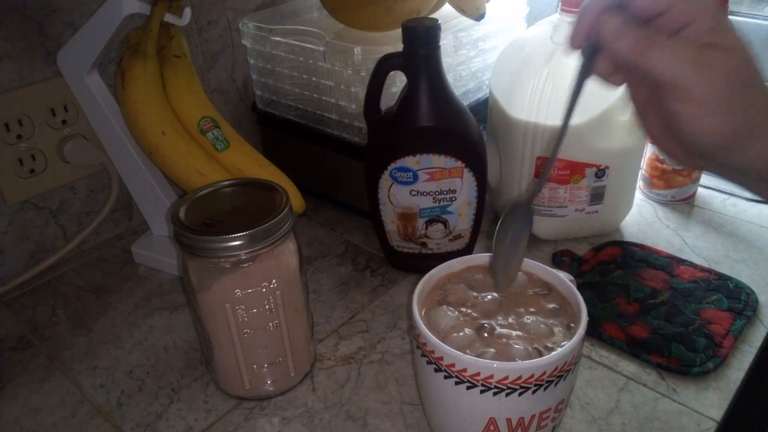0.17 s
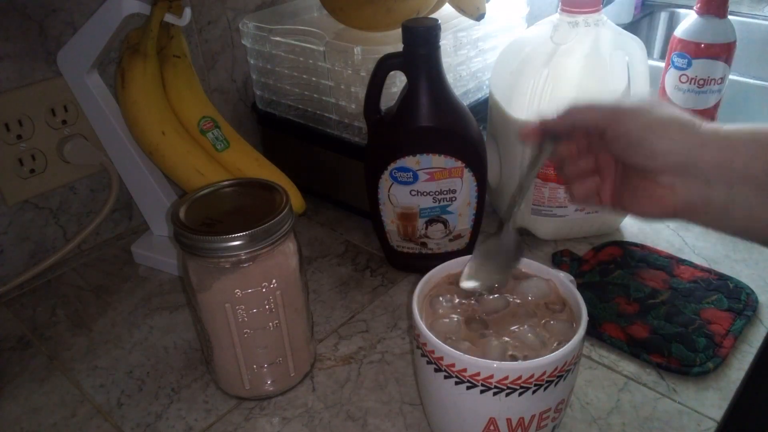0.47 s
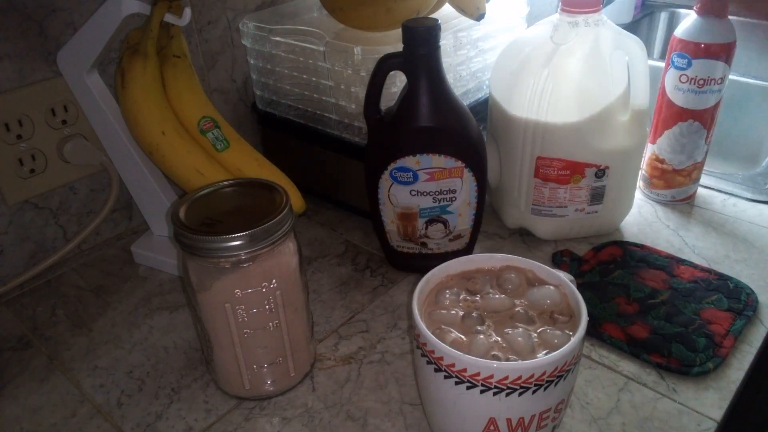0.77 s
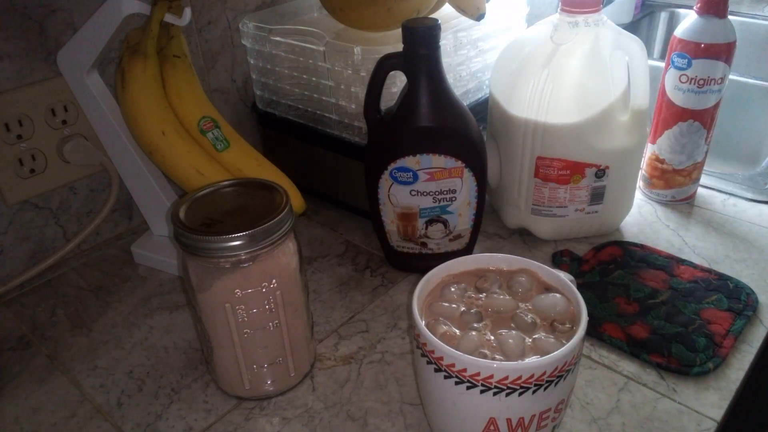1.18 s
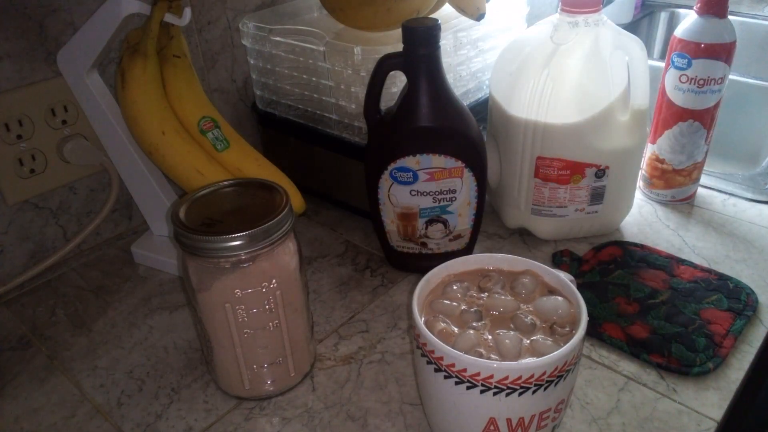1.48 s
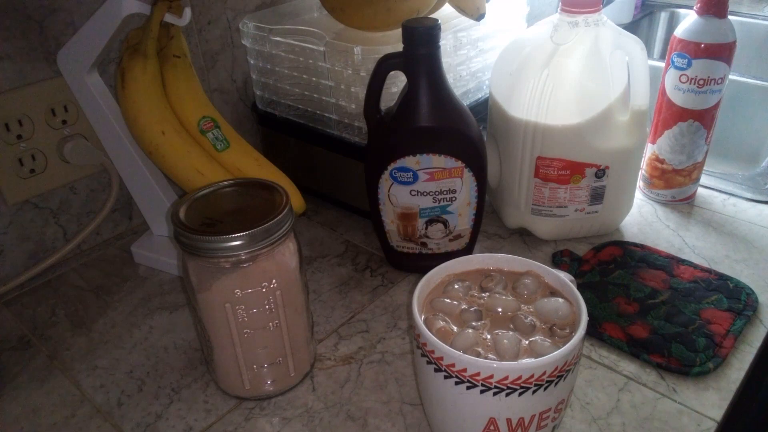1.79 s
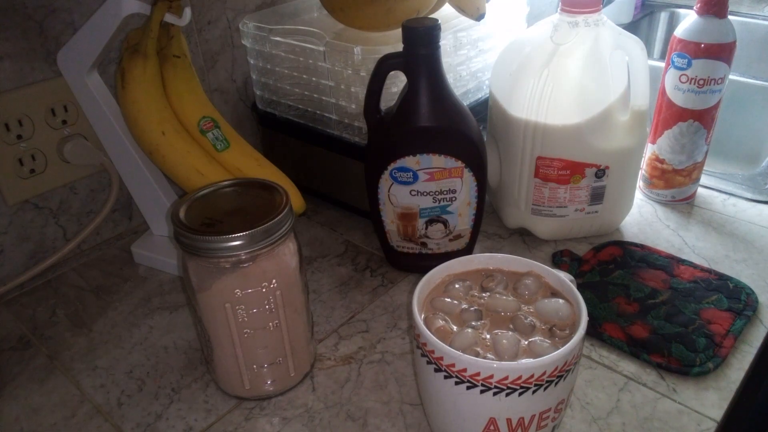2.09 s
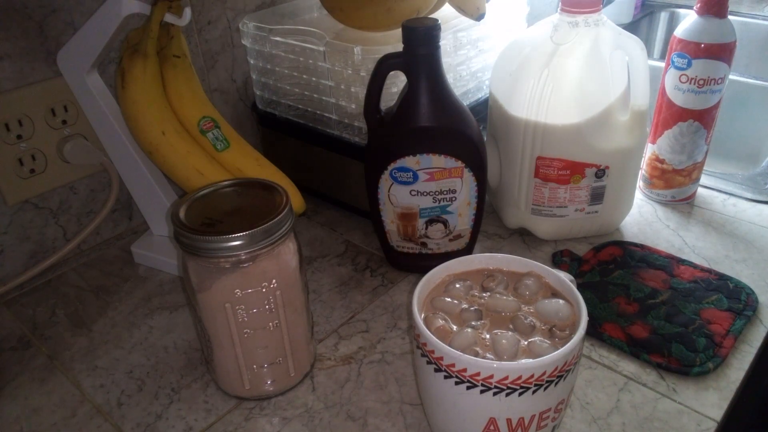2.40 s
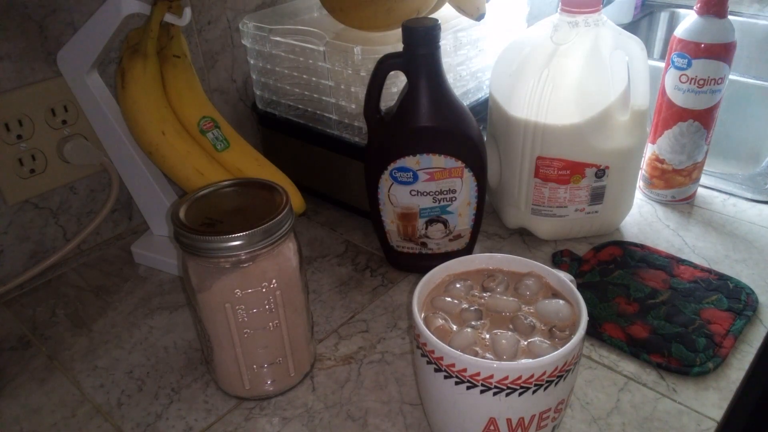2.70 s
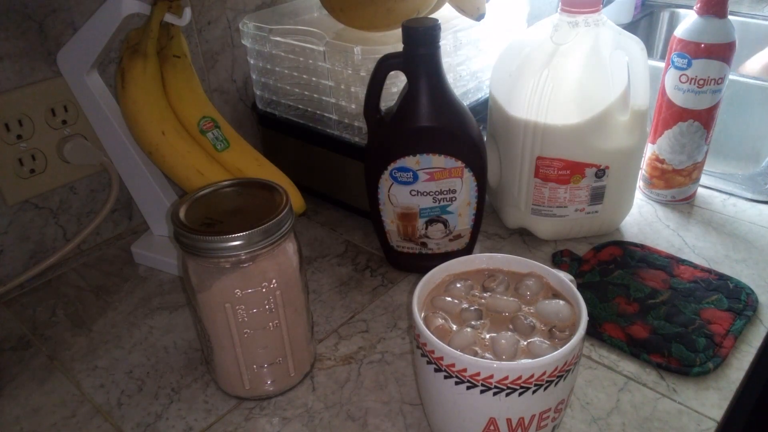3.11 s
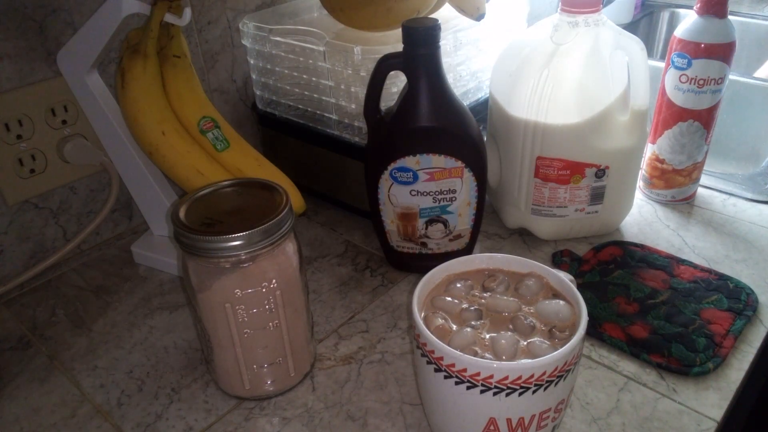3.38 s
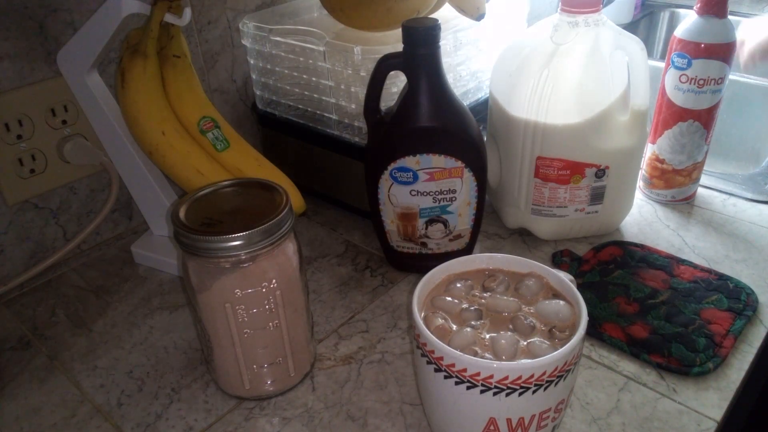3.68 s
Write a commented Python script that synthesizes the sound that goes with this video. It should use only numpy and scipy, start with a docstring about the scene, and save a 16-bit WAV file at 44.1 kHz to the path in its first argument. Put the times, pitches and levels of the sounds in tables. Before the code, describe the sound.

A spoon briefly stirs ice in a mug, then lands rattling in a metal sink.

```python
"""A steel spoon clinks through an iced drink in a last stir, knocks the mug and is lifted out; the ice
settles. Light ticks and soft shuffles follow over a refrigerator's hum. Then metal, probably the spoon,
strikes a steel sink, bounces and rattles to rest. Impacts excite damped modes and bursts of noise,
friction makes swelling noise, and a small kitchen, heard from close by, adds a short reverberation."""
import sys
import numpy as np
from scipy import signal
from scipy.fft import rfft, irfft
from scipy.io import wavfile
from scipy.ndimage import uniform_filter1d

SR = 44100
rng = np.random.default_rng(int(sys.argv[2]) if len(sys.argv) > 2 else 0)


def wrap_up_sound(samples):
    """Save the sound to the file named by the first command line argument, as 16-bit audio."""
    columns = np.atleast_2d(samples).T
    # keep every value between -1 and 1, then stretch to whole-number steps
    tamed = np.clip(columns, -1, 1)
    steps = np.round(tamed * 32767).astype(np.int16)
    wavfile.write(sys.argv[1], SR, steps)


N = 169785
T = np.arange(N) / SR
EVENT_T = T[:int(.7 * SR)]  # time within one event [s]

# spoon against mug and ice (time [s], crack [dB], mug ring [dB], spoon ring [dB])
SPOON_KNOCKS = [(0.0, -35, -54, -58), (0.0642, -47, -19, -36), (0.0987, -24, -35, -35.5),
                (0.143, -35, -49, -64), (0.1818, -37.5, -42.5, -53), (0.191, -35.5, -66, -56)]
# modes of the filled mug and the hand-held spoon (frequency [Hz], level [dB], T60 [s])
MUG_MODES = [(1180, -18.5, 0.02), (1650, -22.5, 0.034), (2126, -9.5, 0.059), (2253, 0, 0.02),
             (2940, -1.5, 0.023), (4730, -27.5, 0.019), (7000, -14.5, 0.028), (8400, -26, 0.044),
             (11500, -21, 0.039), (15400, -4.5, .015)]
SPOON_MODES = [(2650, 2, 0.077), (5520, -3, 0.092), (10130, -11, 0.094), (15040, -5, 0.087)]
# envelope of the stirring (time [s], level [dB])
STIR_ENVELOPE = [(0, -40), (.05, -54), (.08, -41), (.115, -37.5), (.16, -48.5), (.22, -48.5), (.28, -63),
                 (.38, -72.5), (.46, -73)]
# the knocked mug thumps on the counter (time [s], level [dB])
MUG_THUMPS = [(.068, -35.5), (.095, -43)]
# spectra of a crack, the churning ice and a thump (frequency [Hz], level [dB])
CRACK_SPECTRUM = [(25, -47), (150, -13), (700, -10), (1500, -5.5), (3000, 8.5), (6500, -2), (8600, -27),
                  (12000, -12), (14000, -20), (15500, -15)]
CHURN_SPECTRUM = [(25, -51), (90, -12), (130, 14), (420, 2), (800, -1.5), (2000, 8), (3200, 4),
                  (6500, -7.5), (8500, -31.5), (15000, -40)]
THUMP_SPECTRUM = [(25, -44), (60, -24), (125, 1.5), (250, -4), (400, -7.5), (700, -9.5), (1200, -6.5),
                  (3000, -28)]
# cubes touching and drops falling (time [s], level [dB], pitch [Hz])
ICE_CLICKS = [(0.0195, -36, 2850), (0.0596, -30, 2830), (.081, -34, 5900), (.1445, -34.5, 1720),
              (0.1832, -28, 2940), (.2084, -40, 2000), (.235, -41, 3000), (0.3325, -54.5, 1320),
              (0.367, -46.5, 3000), (.385, -47, 2440), (0.4275, -55, 2500), (0.4826, -41.5, 4200),
              (.495, -47.5, 2870), (1.7885, -56, 2440)]
# modes of a cube (frequency [multiple of its pitch], level [dB])
CUBE_MODES = [(.94, -14), (1, 3), (1.09, -4), (1.22, -15)]

# blows on the sink (time [s], clash [dB], sheet wash [dB], basin ring [dB], boom [dB], cutlery [dB])
SINK_BLOWS = [(3.1815, -21, -30, -36.5, -50, -46.5), (3.207, -38, -39, -49.5, -33, -68),
              (3.4712, -20, -40, -37.5, -51, -47), (3.511, -20, -43, -52, -63, -27),
              (3.551, -18, -32, -31.5, -41, -51), (3.664, -46, -41.5, -57, -33, -61)]
# starting levels of the rattle (clash [dB], sheet wash [dB], basin ring [dB], boom [dB], cutlery [dB])
RATTLE_LEVELS = (-22, -35.5, -39, -36.5, -66)
# modes of the basin, its low boom and the free cutlery (frequency [Hz], level [dB], T60 [s])
BASIN_MODES = [(484.9, -10, .7), (588.3, -1, .42), (640, -10, .2), (706, -5, .35), (742, -8, .3),
               (795, -11, .3), (854.6, -6, .45), (1040, -13, .3), (1351, -16, .4), (1839, -14, .45),
               (1862, -14, .45)]
BOOM_MODES = [(112, -16, .2), (155, -10, .25), (189.3, 0, .42), (270.7, -5, .3), (369.4, -9, .3)]
CUTLERY_MODES = [(4650, -15, .45), (5275, -16, .35), (7134, -13, .35), (10736, 0, .17), (10809, -5, .17),
                 (11219, -11, .2), (15008, -4, .22), (15323, -6, .22)]
# spectra of the clash and the steel sheet's dense modes (frequency [Hz], level [dB])
CLASH_SPECTRUM = [(200, -34), (600, 4.5), (1300, -10), (1900, 0.5), (2700, -1.5), (6400, 1.5), (8200, -6.5),
                  (12000, -3.5), (13800, 0), (15200, 7.5)]
SHEET_SPECTRUM = [(80, -16), (170, 11), (400, 5), (650, 11), (1300, 3.5), (1900, 6.5), (2700, -1),
                  (6400, 0.5), (8200, -5), (12000, -1.5), (13800, -3), (15200, -17.5)]
# decay of the sheet (frequency [Hz], T60 [s])
SHEET_DECAY = [(200, 0.41), (2000, 0.36), (6500, 0.45), (9000, 0.25), (15000, 0.15)]
# envelope of metal sliding between blows (time [s], level [dB])
SLIDE_ENVELOPE = [(3.2, -62), (3.29, -59), (3.335, -46.5), (3.39, -56), (3.435, -53.5), (3.47, -57.5)]
# resonances of the slide (centre [Hz], width [Hz], level [dB])
SLIDE_BANDS = [(450, 100, 7), (1850, 220, 1), (2660, 220, -12.5), (3190, 160, -11), (4380, 320, -2),
               (5360, 140, -11), (6540, 260, -2), (7480, 200, -8.5), (4000, 7800, -4.5), (12500, 2430, -4),
               (15100, 900, -5)]

# ticks (time [s], level [dB], centre [Hz], half-width [octaves], sizzle [dB], reverberation [dB])
LIGHT_TICKS = [(0.8414, -45.5, 10900, 0.23, -40, -16), (0.848, -46.5, 5900, 0.54, -33, -11),
               (0.8902, -39, 5650, 0.18, -54, -1.5), (.893, -53.5, 2680, 0.23, -66, 9),
               (1.2441, -42.5, 6200, 0.11, -69, -10.5), (1.2461, -48, 3600, 0.17, -65, -7.5),
               (1.281, -47, 9340, 0.19, -62, -3.5), (1.4729, -46, 4550, .25, -23, -1),
               (1.4788, -52.5, 3760, 0.12, -36, -4), (1.6548, -43.5, 5330, 0.69, -65, -5),
               (2.138, -50.5, 9680, 0.031, -49, 4)]
# shuffles (peak time [s], 20 dB rise [s], 20 dB fall [s], swish [dB], rub [dB])
SOFT_SHUFFLES = [(.9, 0.078, 0.063, -49.5, -68), (1.571, 0.033, 0.078, -40.5, -47),
                 (1.673, 0.041, 0.078, -43, -53.5), (2.059, 0.051, 0.27, -61.5, -71.5),
                 (2.262, 0.059, 0.16, -51, -54), (2.305, 0.081, 0.097, -49, -55.5),
                 (2.431, 0.28, 0.067, -56, -68), (2.634, 0.054, 0.12, -60, -65.5),
                 (2.72, 0.075, 0.096, -53, -61.5), (2.884, 0.04, 0.09, -47.5, -99),
                 (2.925, 0.062, 0.049, -49, -80)]
# spectra of the bright swish and the lower rub (frequency [Hz], level [dB])
SWISH_SPECTRUM = [(800, -48), (2500, -13), (4000, -7.5), (5900, 1.5), (6800, -3.5), (8000, -14.5),
                  (9700, -8.5), (13500, -11), (15200, -1)]
RUB_SPECTRUM = [(300, -6), (800, -5), (1500, -1.5), (2500, -0.5), (4000, -1.5), (12000, -25)]

# steady tones of the refrigerator's motor (frequency [Hz], level [dB])
MOTOR_TONES = [(360.5, -72), (425.5, -69)]
# narrow noise bands of the refrigerator's hum (centre [Hz], half-width [Hz], level [dB], fall [dB/s])
HUM_BANDS = [(128.5, 9.3, -57, 1), (180.2, 19, -58.5, 2.3), (241.9, 12.8, -59, 1.5), (281.3, 25, -65, 1),
             (357, 21, -62, 4.5)]
# envelope of the hum (time [s], gain [dB])
HUM_ENVELOPE = [(0, -16), (.25, 4.5), (.34, -10), (.41, 1.5), (.56, 2), (.69, 3), (.73, -10), (.88, 10),
                (1.1, -4), (1.32, 9), (1.46, -5), (1.62, -2), (1.89, 1.5), (2.0, -6.5), (2.38, -4),
                (2.8, -1.5), (3.1, 2.5), (3.85, -1.5)]
# spectrum of the ambient noise (frequency [Hz], level [dB])
AIR_SPECTRUM = [(20, -26), (50, -11.5), (85, -13), (130, 0.5), (300, -6.5), (500, -13.5), (1000, -21.5),
                (2000, -29), (6000, -33), (8500, -42.5), (15000, -39.5)]
# reverberation time of the kitchen (frequency [Hz], T60 [s])
ROOM_DECAY = [(150, 0.33), (1000, 0.16), (6000, 0.23), (10000, 0.093), (15000, 0.16)]


def stirred_drink(room_db=-12.5):
    """Impact excitation: each contact gives a burst of noise; mug, spoon and cubes ring in their modes."""
    out = churning_ice()
    for start, crack_db, mug_db, spoon_db in SPOON_KNOCKS:
        crack = amp(crack_db) * burst(noise(CRACK_SPECTRUM), t60=0.023)
        add(out, start, crack + amp(mug_db) * ring(MUG_MODES) + amp(spoon_db) * ring(SPOON_MODES))
    for start, db in MUG_THUMPS:
        add(out, start, amp(db) * burst(noise(THUMP_SPECTRUM), t60=0.3))
    for start, db, hz in ICE_CLICKS:
        cube = ring([(hz * ratio, mode_db, 0.018) for ratio, mode_db in CUBE_MODES])
        chip = amp(-9.5) * burst(band(hz, octaves=0.45), t60=0.011)
        add(out, start, amp(db) * (cube + chip) * rise(seconds=0.00025))
    return out + amp(room_db) * reverberation(out)


def churning_ice(contacts_per_s=700, spread_db=2.5):
    """Shot noise: many small collisions at random times merge into a grainy churn."""
    impulses = (rng.random(N) < contacts_per_s / SR) * rng.choice([-1, 1], N)
    strengths = amp(spread_db * np.minimum(rng.exponential(size=N), 3))
    grain = rng.standard_normal(len(EVENT_T)) * fade(t60=.02)
    churn = signal.fftconvolve(impulses * strengths, grain)[:N]
    return colour(churn, CHURN_SPECTRUM) * envelope(STIR_ENVELOPE, right=-120)


def steel_sink(shimmer_depth=0.5, room_db=-7):
    """Plate vibration: each blow excites the basin's sparse and dense modes, and the cutlery rings."""
    out, ringing = np.zeros(N), np.zeros(N)
    blows = SINK_BLOWS + rattle()
    sheet = wash(ripple(noise(SHEET_SPECTRUM), db=1.5, spacing_hz=128.6), SHEET_DECAY)
    for start, clash_db, sheet_db, basin_db, boom_db, cutlery_db in blows:
        clash = amp(clash_db) * burst(noise(CLASH_SPECTRUM), t60=0.13)
        boom = amp(boom_db) * ring(BOOM_MODES, scatter_db=2.5) * rise(seconds=0.0036)
        add(out, start, (clash + amp(sheet_db) * sheet + boom) * rise(seconds=0.002))
        basin = amp(basin_db) * ring(BASIN_MODES, scatter_db=1.5)
        cutlery = amp(cutlery_db) * ring(CUTLERY_MODES, scatter_db=2)
        add(ringing, start, basin + cutlery)
    shimmer = 1 + shimmer_depth * flicker(seconds=0.011)  # the ring wavers as the metal shifts
    out += ringing * shimmer + sliding_metal()
    return out + amp(room_db) * reverberation(out)


def rattle(start_s=3.56, end_s=3.6887, bounces_per_s=110, fade_db=10, scatter_db=3):
    """Inelastic rebounds: quick, uneven blows lose energy. Returns rows like those of SINK_BLOWS."""
    blows = []
    for k, (jitter, strength) in enumerate(rng.uniform(-1, 1, (32, 2))):
        time = start_s + (k + jitter / 2) / bounces_per_s
        progress = (time - start_s) / (end_s - start_s)
        if progress < 1:
            levels = np.array(RATTLE_LEVELS) - fade_db * progress ** 2 + scatter_db * strength
            blows.append((time, *levels))
    return blows


def sliding_metal():
    """Sliding friction drives the resonances of metal on the basin with noise."""
    scrape = sum(amp(db) * band(hz, np.log2(1 + width / hz / 2), N) for hz, width, db in SLIDE_BANDS)
    return unit(scrape) * envelope(SLIDE_ENVELOPE, left=-120, right=-120)


def ticks():
    """Brief, hard contacts excite high frequencies: a damped resonance and a very high sizzle."""
    out, to_room = np.zeros(N), np.zeros(N)
    for start, db, hz, octaves, sizzle_db, room_db in LIGHT_TICKS:
        sizzle = band(15150, octaves=.045) + amp(-14.5) * band(14500, octaves=0.38)
        tick = amp(db) * burst(band(hz, octaves), t60=0.029) + amp(sizzle_db) * burst(sizzle, t60=.012)
        add(out, start, tick)
        add(to_room, start, amp(room_db) * tick)
    return out + reverberation(to_room)


def shuffles(grain_db=1.0, surge_db=1.5, room_db=-11):
    """Friction noise: cloth or soles brush in grainy strokes that swell and die away."""
    out = np.zeros(N)
    middle_s = EVENT_T.mean()
    from_peak = EVENT_T - middle_s
    for peak_s, rise_s, fall_s, swish_db, rub_db in SOFT_SHUFFLES:
        swell = amp(-20 * np.maximum(-from_peak / rise_s, from_peak / fall_s))
        swish = amp(swish_db) * ripple(noise(SWISH_SPECTRUM), db=3.5, spacing_hz=260)
        rub = amp(rub_db) * ripple(noise(RUB_SPECTRUM), db=4, spacing_hz=170)
        add(out, peak_s - middle_s, swell * (swish + rub))
    out *= unit(amp(grain_db * flicker(seconds=0.0015) + surge_db * flicker(seconds=0.02)))
    return out + amp(room_db) * reverberation(out)


def background(air_db=-59.5):
    """Narrow-band noise: the refrigerator's low, wavering hum, with its steady motor tones and dull air."""
    hum = sum(amp(db - fall * T) * band(hz, np.log2(1 + half_width / hz), N)
              for hz, half_width, db, fall in HUM_BANDS)
    motor = sum(amp(db) * unit(np.sin(2 * np.pi * hz * T)) for hz, db in MOTOR_TONES)
    return hum * envelope(HUM_ENVELOPE) + motor + amp(air_db) * noise(AIR_SPECTRUM, N)


def reverberation(x, build_s=0.002):
    """Diffuse reflections: convolution with the kitchen's decaying response of unit energy."""
    build_up = 1 - np.exp(-(EVENT_T / build_s) ** 2)
    response = wash(rng.standard_normal(len(EVENT_T)), ROOM_DECAY) * build_up
    return signal.fftconvolve(x, response / np.sqrt(np.sum(response ** 2)))[:N]


def ring(modes, scatter_db=0):
    """Free vibration as a sum of damped sines; scatter varies level and sign, as the struck spot does."""
    out = np.zeros(len(EVENT_T))
    for hz, db, t60 in modes:
        strength, side = rng.standard_normal(2)
        gain = amp(db + scatter_db * strength) * (np.sign(side) if scatter_db else 1)
        out += gain * np.sin(2 * np.pi * hz * EVENT_T) * fade(t60)
    return out


def wash(x, decays):
    """Modal overlap: countless modes act as noise, each octave fading at its own rate."""
    hz, t60 = np.array(decays, float).T
    log_centres = np.log(np.geomspace(125, 16000, 8))
    log_f, spectrum = np.log(frequencies(len(x))), rfft(x)
    out = np.zeros(len(x))
    for centre, weights in zip(log_centres, np.eye(len(log_centres))):
        octave = irfft(spectrum * np.interp(log_f, log_centres, weights), len(x))
        out += octave * fade(np.interp(centre, np.log(hz), t60))
    return out


def ripple(x, db, spacing_hz):
    """Interference: reflections from nearby surfaces cut random peaks and dips into a spectrum."""
    f = np.fft.rfftfreq(len(x), 1 / SR)
    heights = rng.standard_normal(512)
    gain = amp(db * np.interp(f / spacing_hz, np.arange(len(heights)), heights))
    return unit(irfft(rfft(x) * gain, len(x)))


def colour(x, points):
    """Filter by (frequency [Hz], level [dB]) points; rms 1."""
    hz, db = np.array(points, float).T
    gain = amp(np.interp(np.log(frequencies(len(x))), np.log(hz), db))
    return unit(irfft(rfft(x) * gain, len(x)))


def noise(points, size=len(EVENT_T)):
    """Coloured noise, rms 1."""
    return colour(rng.standard_normal(size), points)


def band(hz, octaves, size=len(EVENT_T)):
    """Noise in one steep-sided band, rms 1."""
    detuning = np.log2(frequencies(size) / hz) / octaves
    return unit(irfft(rfft(rng.standard_normal(size)) / (1 + detuning ** 2 / 2) ** 2, size))


def burst(x, t60):
    """Noise decaying exponentially from level 1."""
    decay = fade(t60)
    return unit(x * decay) * np.sqrt(np.mean(decay ** 2))


def fade(t60):
    """Exponential damping: 60 dB in t60 seconds."""
    return np.exp(-np.log(1000) * EVENT_T / t60)


def rise(seconds):
    """Soft onset of a contact."""
    return 1 - np.exp(-EVENT_T / seconds)


def flicker(seconds):
    """Random wavering on a given time scale, rms 1."""
    size = int(seconds * SR)
    return unit(uniform_filter1d(uniform_filter1d(rng.standard_normal(N), size), size))


def envelope(points, left=None, right=None):
    """Gain along (time [s], level [dB]) points; left and right are the levels outside them."""
    return amp(np.interp(T, *np.array(points).T, left=left, right=right))


def frequencies(size):
    """Frequency axis of a spectrum, at least 1 Hz."""
    return np.maximum(np.fft.rfftfreq(size, 1 / SR), 1)


def amp(db):
    """Decibels to gain."""
    return 10 ** (np.asarray(db) / 20)


def unit(x):
    """Scale to rms 1."""
    return x / np.sqrt(np.mean(x ** 2) + 1e-30)


def add(out, start_s, x):
    """Mix x into out from start_s."""
    i = min(max(int(start_s * SR), 0), N)
    out[i:i + len(x)] += x[:N - i]


def scene():
    """Superposition: the pressures of all sources add at one point."""
    return (background() + stirred_drink() + ticks() + shuffles() + steel_sink())[None]


def record(dry, low_cut_hz=50, top_hz=15800):
    """Band limiting: filters remove the deep bass and the highest treble."""
    thin = signal.sosfilt(signal.butter(2, low_cut_hz, "high", fs=SR, output="sos"), dry)
    return signal.sosfilt(signal.ellip(10, .2, 70, top_hz, fs=SR, output="sos"), thin)


dry = scene()
out = record(dry)
wrap_up_sound(out)
```